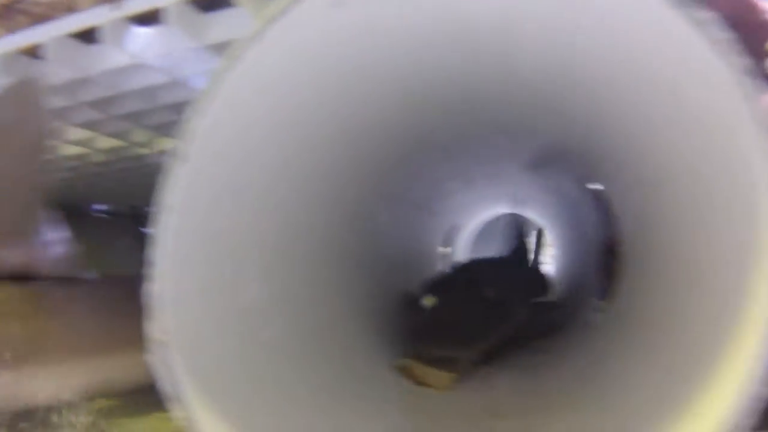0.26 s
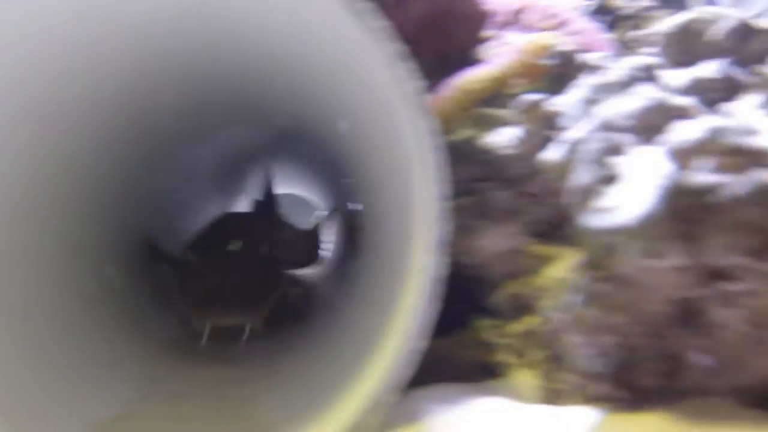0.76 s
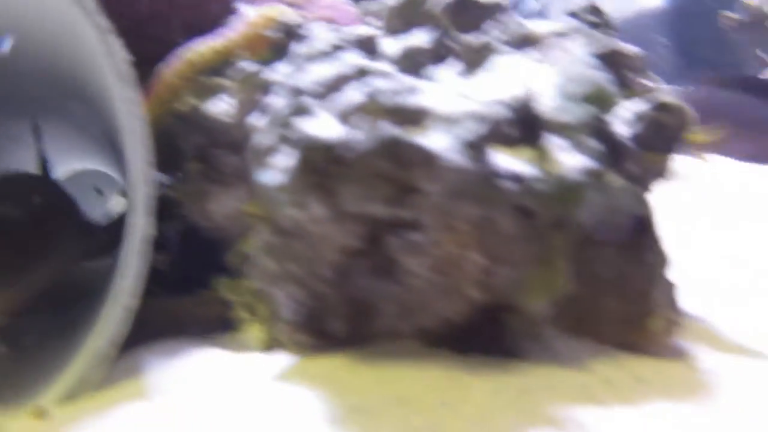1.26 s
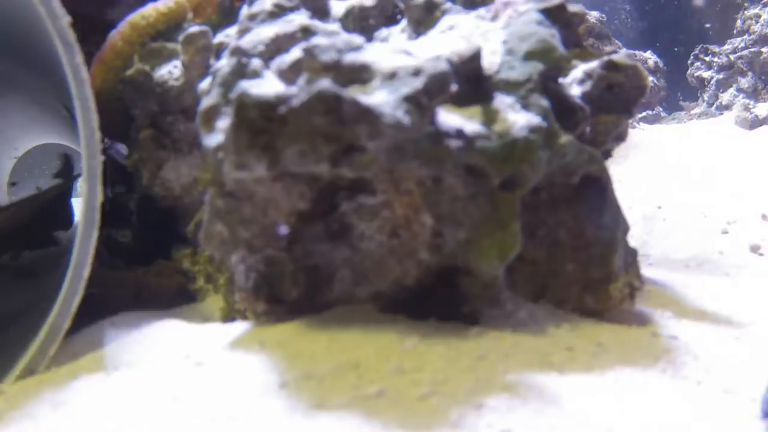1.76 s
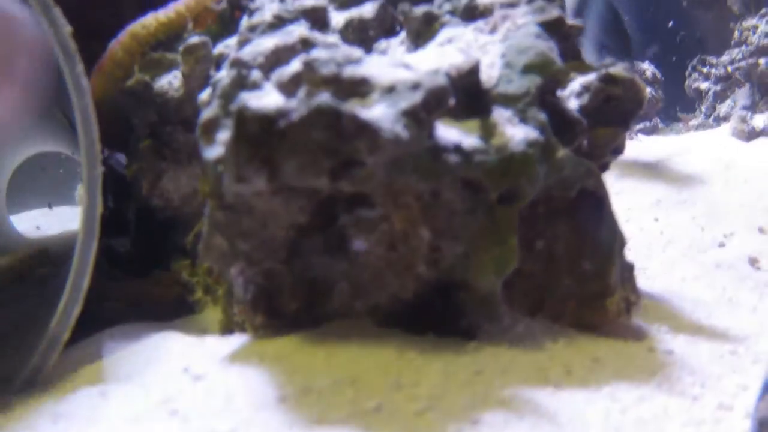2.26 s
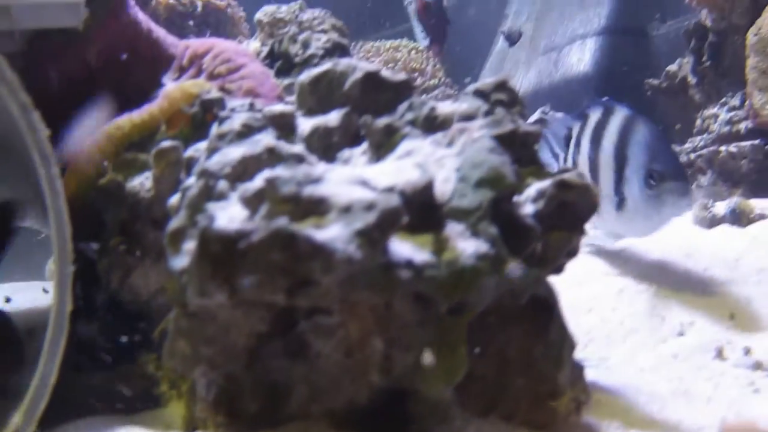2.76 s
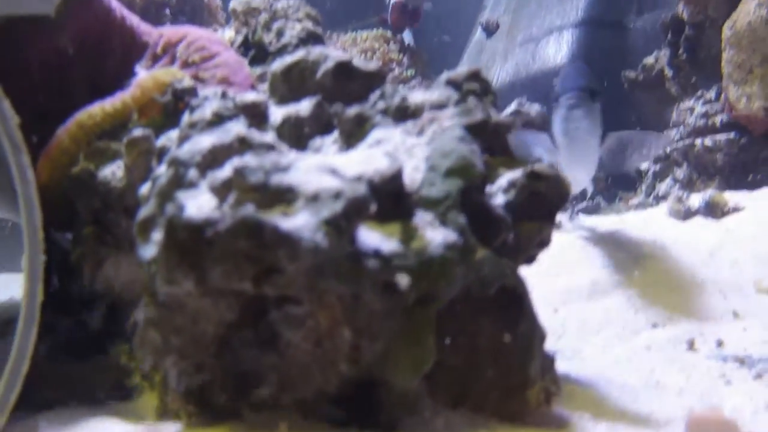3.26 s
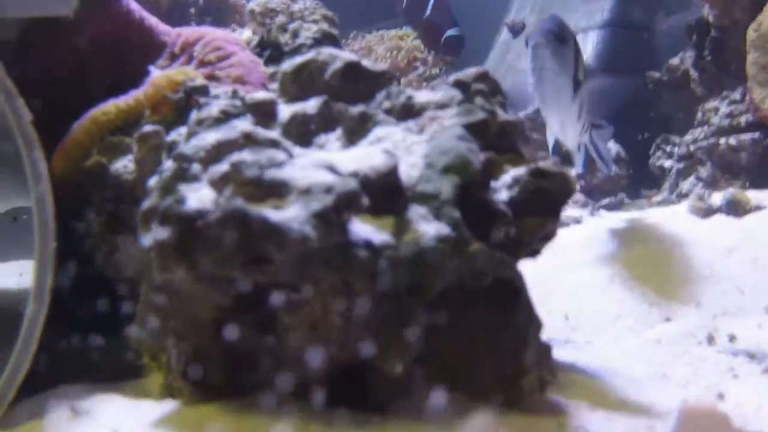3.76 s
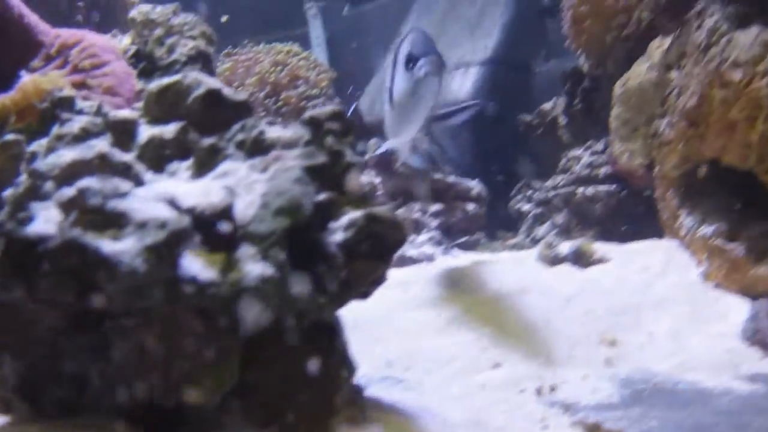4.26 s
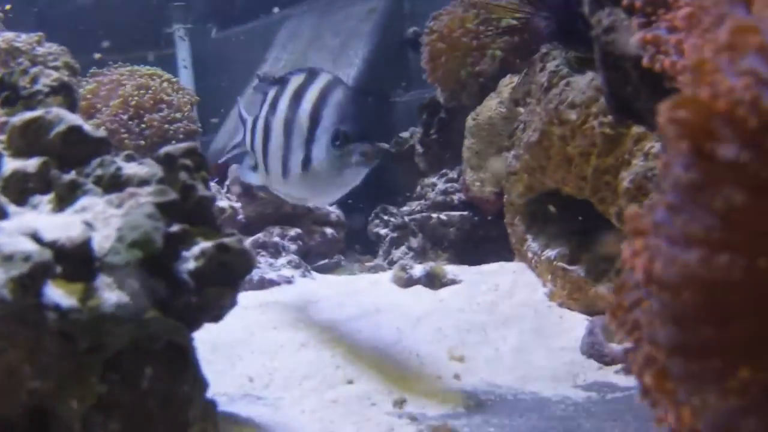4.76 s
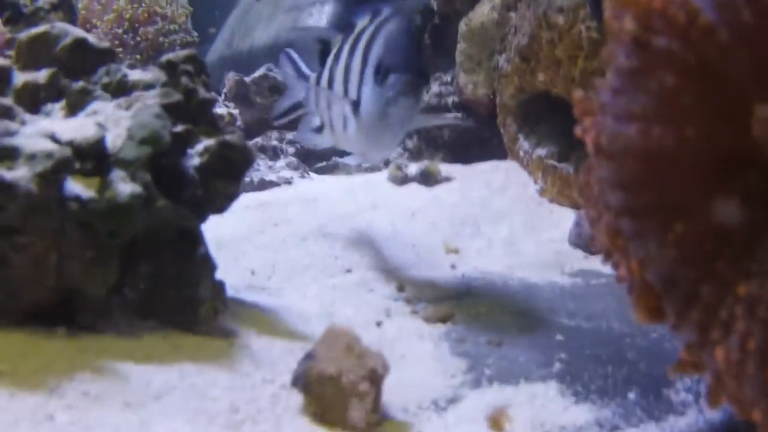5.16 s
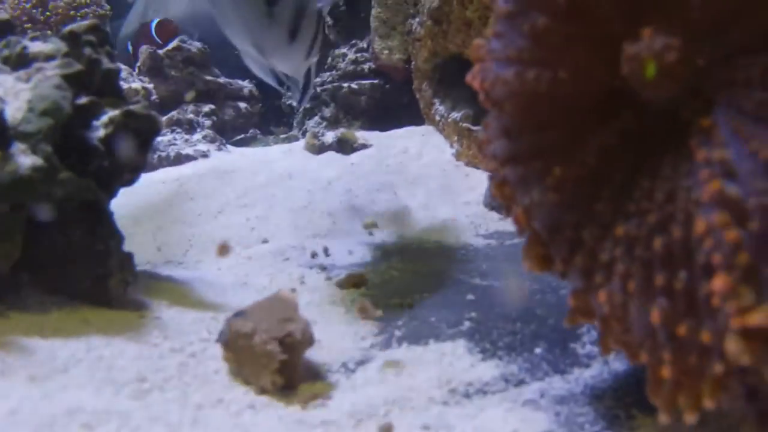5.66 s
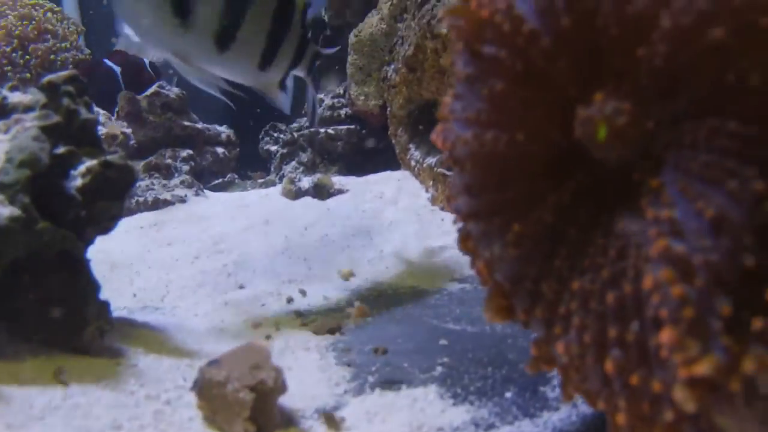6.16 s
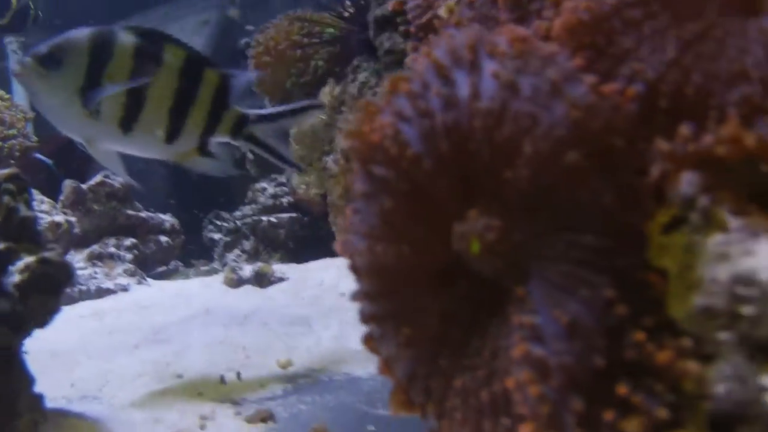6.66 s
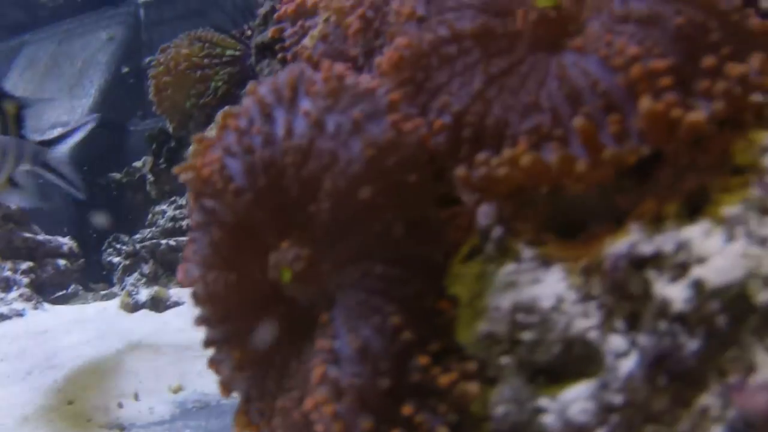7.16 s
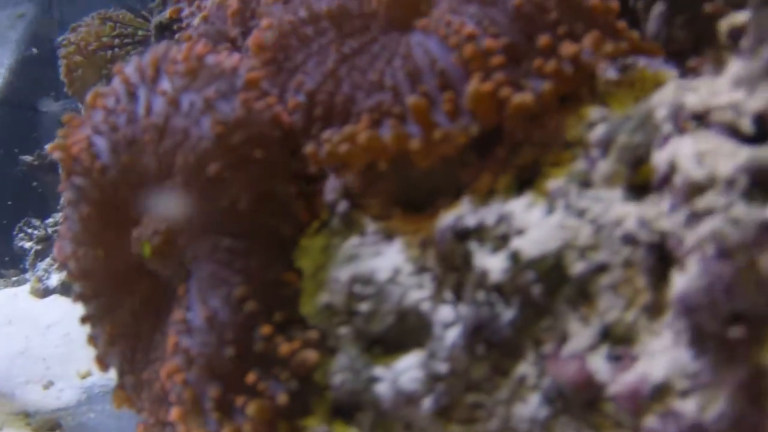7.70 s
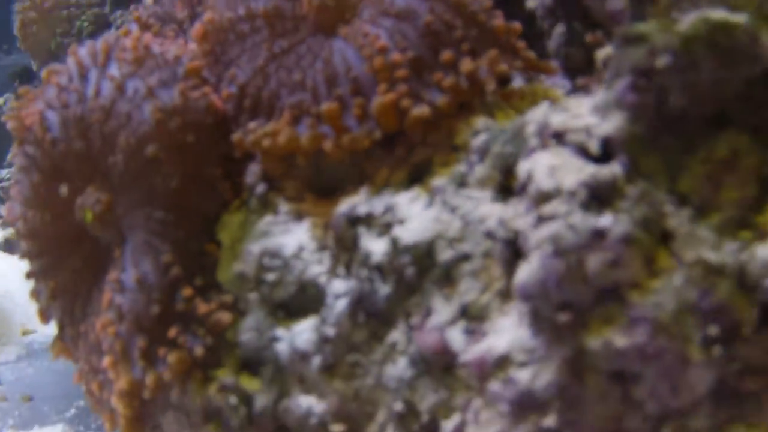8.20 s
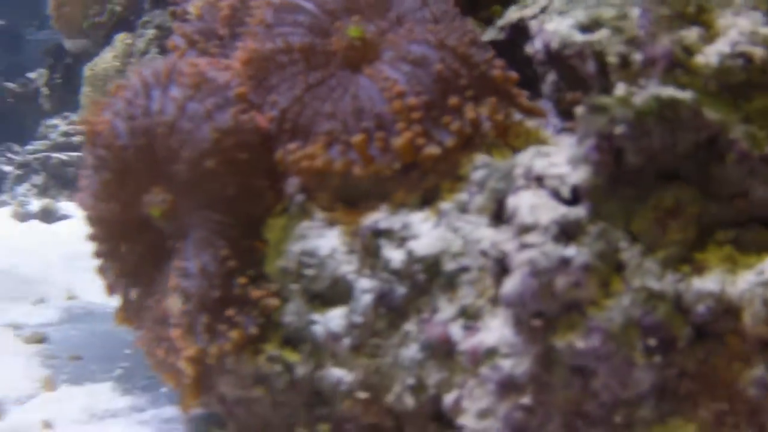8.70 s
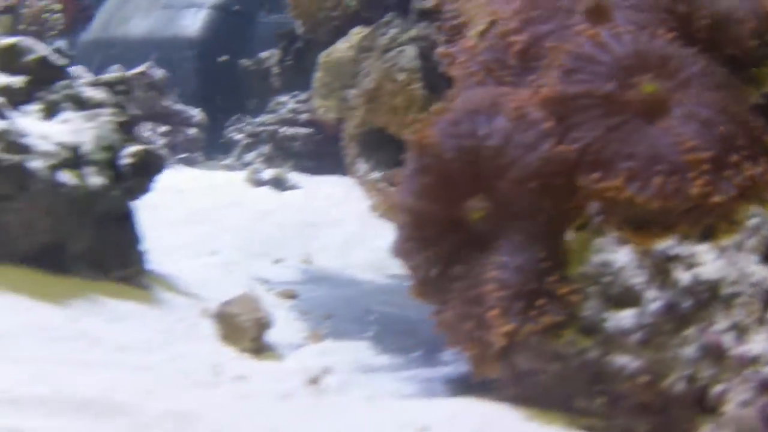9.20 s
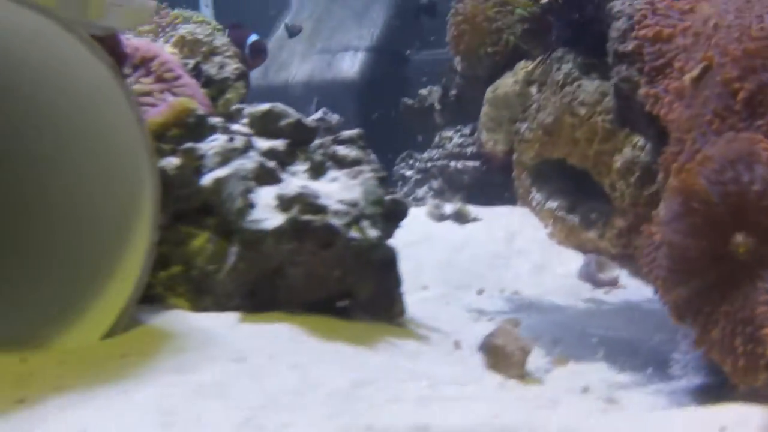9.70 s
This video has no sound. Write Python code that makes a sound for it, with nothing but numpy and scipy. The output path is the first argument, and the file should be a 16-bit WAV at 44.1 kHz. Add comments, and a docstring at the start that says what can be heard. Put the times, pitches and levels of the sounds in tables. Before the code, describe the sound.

A steady low mains hum and lumpy water rumble underlie a microphone enclosed underwater. Sand grains grind along its walls, strongest in the opening second and a half and again just after three and a half seconds. Between strokes come dry, ringing ticks and faint crackling, with a few soft bumps. Later scrapes are lighter, and the ending is mostly sparse clicks. Coarse, narrow, single-channel sound.

```python
"""A camera in a sealed housing slides over the sand of a fish tank: grains scrape its walls in strokes.
Single grains or bubbles tick on the lens cover as short snaps with ringing modes; dull bumps hit the housing.
Behind them pumps hum as sines at multiples of the mains and the water rumbles as shaped noise.
The sound is sampled slowly and each sample is held, which mirrors everything around the sampling rate."""
import sys
import numpy as np
from scipy import signal
from scipy.fft import rfft, irfft
from scipy.io import wavfile

SR = 44100
rng = np.random.default_rng(int(sys.argv[2]) if len(sys.argv) > 2 else 0)


def transcribe(signal):
    """Save signal, clipped to [-1, 1], as a 16-bit WAV file at the path in sys.argv[1]."""
    frames = np.atleast_2d(signal).T
    limited = np.clip(frames, -1, 1)
    pcm = np.round(limited * 32767).astype(np.int16)
    wavfile.write(sys.argv[1], SR, pcm)


N = 438354
TAIL = 4000  # length of one ping in samples


# Strokes over the sand, each a list of (time [s], hiss level above 2900 Hz [dB], low end against the hiss [dB])
STROKES = [
    [(0, -58, -2), (0.25, -56, -4.5), (0.335, -54, -2.5), (0.375, -51, -3), (0.42, -53, 0),
     (0.57, -59.5, -1.5)],
    [(0.57, -57.5, -2), (0.72, -55, -3), (0.78, -56.5, -3), (0.92, -53.5, -3.5), (1.0, -57.5, -2),
     (1.17, -54.5, -6), (1.29, -47, -4), (1.39, -50, -1.5), (1.49, -61, 3), (1.6, -85.5, 0)],
    [(2.07, -90, 6), (2.125, -64, -3), (2.175, -72.5, -9), (2.28, -68.5, 5.5), (2.31, -58.5, 4),
     (2.41, -63, 4.5), (2.51, -59.5, -4), (2.73, -61, 4.5), (2.87, -67, 1)],
    [(2.87, -64.5, 2), (3.0, -65.5, 0.5), (3.2, -69, -1), (3.32, -67.5, 1.5), (3.56, -65, -0.5),
     (3.594, -62, 2)],
    [(3.597, -48, 4), (3.62, -47.5, 3.5), (3.77, -52.5, 1.5), (3.81, -49.5, -2.5), (3.94, -56.5, -4),
     (3.98, -61, -2.5), (4.19, -61, -3), (4.3, -66.5, -0.5)],
    [(4.3, -63, -1.5), (4.36, -67.5, -2), (4.45, -65, 1), (4.51, -59, -2), (4.71, -55, -3.5),
     (4.77, -67, -4)],
    [(4.77, -66, -4), (4.87, -65, -5.5), (5.01, -60.5, -3), (5.09, -53.5, -3), (5.17, -50, -4),
     (5.31, -56.5, -1), (5.47, -60, -4.5), (5.535, -57, -7.5), (5.6, -70.5, 2)],
    [(5.6, -68, 0), (5.63, -64, -3.5), (5.82, -72, -0.5), (5.95, -69, 1), (6.21, -61, -1),
     (6.31, -65.5, -6), (6.37, -64.5, 2.5), (6.45, -68, -0.5), (6.5, -71.5, -5)],
    [(6.5, -69, -6), (6.555, -53.5, 0.5), (6.64, -56.5, -2), (6.86, -57, -4.5), (6.95, -59.5, -3.5),
     (7.17, -59.5, -1.5), (7.26, -55.5, -3), (7.52, -60.5, -1), (7.67, -61.5, -1), (7.72, -69, -8)],
    [(7.72, -66, -1), (7.81, -63.5, -7), (7.99, -58.5, 0), (8.13, -57.5, -3.5), (8.25, -62, -1.5),
     (8.31, -75, 0), (8.41, -63.5, -2), (8.47, -63, -2.5), (8.64, -75, -6)],
    [(8.8, -84, -6), (8.875, -57, -13), (8.9, -61, -4), (8.93, -54, -6), (8.97, -52.5, -4.5),
     (9.05, -72.5, 2), (9.08, -86, 4)],
]
# Spectrum of the sand hiss: (frequency [Hz], relative density [dB per Hz])
SAND_SPECTRUM = [(150, -8), (300, -12), (650, -16), (1200, -12), (1750, -14), (2750, -18), (2920, -14),
                 (3080, -16.5), (4250, -24.5), (4420, -19.5), (4620, -24.5), (5400, -21.5), (5650, -21.5),
                 (6100, -37)]
# Wall modes of the housing: (frequency [Hz], half the width of each resonator [Hz], relative level [dB])
WALL_MODES = [(568, 55, -8), (683, 13, -19.5), (891, 146, -3.5), (1570, 127, 2), (1970, 230, -2),
              (2403, 265, 4.5), (3440, 285, 0.5), (3680, 230, -3)]
# Low end: rumble below 450 Hz, wall modes at 450-720 Hz, wall mode at 720-1200 Hz
LOW_SHARES_DB, LOW_DRIFT_DB = (-4, -1.6, 0.84), 2


def scrape(grains_per_s=1500, grain_db=3.0, share=0.38, catch_db=0.5, drift_db=1.5):
    """Sand grains slip under the housing and ring its walls; each stroke sets its own hiss and low end."""
    t = np.arange(N) / SR
    grain_sizes = gain_of(grain_db * np.minimum(rng.exponential(1, N), 4))
    grains = grain_sizes * (rng.random(N) < grains_per_s / SR)
    grains *= rng.choice([-1., 1.], N)
    slips = share * evened(grains) + (1 - share) * rng.standard_normal(N)
    slips *= gain_of(catch_db * wander(31.7))

    sound = gain_of(10.0) * evened(coloured(slips, SAND_SPECTRUM))
    for hz, half_width, db in WALL_MODES:  # the contact point moves, so each wall mode comes and goes
        once = resonate(slips, hz, 2.0 * half_width)
        twice = resonate(once, hz, 2.0 * half_width)
        sound += gain_of(db + drift_db * wander(9.4)) * evened(twice)

    spectrum = rfft(sound)
    band = np.digitize(np.fft.rfftfreq(N, 1 / SR), [450, 720, 1200, 2900])  # edges in Hz
    low = np.zeros(N)
    for k, db in enumerate(LOW_SHARES_DB):
        low += gain_of(db + LOW_DRIFT_DB * wander(6)) * evened(irfft(spectrum * (band == k), N))
    high = irfft(spectrum * (band > 2), N)
    high /= np.std(irfft(spectrum * (band == 4), N))  # level counts above the tick modes

    out = np.zeros(N)
    for stroke in STROKES:
        s, level_db, low_db = np.transpose(stroke)
        weighted = high + gain_of(np.interp(t, s, low_db)) * low
        out += gain_of(np.interp(t, s, level_db, -200, -200)) * weighted  # silent outside the stroke
    return out


# Clear ticks: (time [s], relative snap level [dB], snap pitch [Hz],
#               relative ring level [dB], pitch favoured by the spot [Hz])
CLEAR_TICKS = [(0.0474, -57, 3520, -48.5, 2160), (1.0294, -51, 3250, -50.5, 2530),
               (1.5494, -70, 3560, -62, 2400), (1.6137, -66, 3630, -69, 2460),
               (1.6334, -65, 3290, -60, 2025), (1.6884, -64, 3360, -62, 2460),
               (1.6943, -57, 3680, -61, 2380), (1.713, -61, 3000, -59, 2370),
               (1.7494, -73, 3250, -64, 2380), (1.782, -72, 3800, -56, 2080),
               (1.8173, -71, 3730, -67, 2340), (1.8394, -71, 3300, -68, 2460),
               (1.861, -72, 3040, -65, 2520), (1.8986, -73, 3220, -66, 2020),
               (1.9194, -71, 3660, -64, 2260), (1.952, -74, 3170, -63.5, 2550),
               (1.9699, -65, 3750, -78, 2320), (2.0354, -64, 3400, -62, 1870),
               (2.0996, -56.5, 3590, -63, 2500), (2.6762, -54, 3180, -53.5, 2300),
               (2.9247, -63, 3500, -58, 2310), (3.0619, -57, 3670, -59, 2280),
               (3.246, -62, 3370, -60.5, 2010), (3.3834, -65, 3380, -58.5, 2295),
               (4.038, -62, 3750, -53, 2380), (4.7985, -55, 3010, -66, 2130),
               (5.8481, -60, 3500, -56, 2460), (5.9444, -60, 3580, -58, 2420),
               (6.0094, -71, 3630, -61, 2320), (6.0554, -69, 3340, -61, 2050),
               (6.1044, -64, 3410, -59, 2240), (6.1414, -58, 3680, -55.5, 2240),
               (6.2734, -67, 2950, -56, 2370), (6.298, -70, 3560, -55.5, 2150),
               (6.37, -49.5, 3500, -55, 2420), (6.4168, -56, 3430, -46.5, 2220),
               (8.2137, -52.5, 4460, -61, 1680), (8.3454, -70, 3620, -64, 2170),
               (8.376, -63, 3420, -54, 2200), (8.4522, -55, 3440, -64, 1640),
               (8.6587, -59.5, 3530, -63, 2700), (8.6894, -68, 3560, -65, 2100),
               (8.7114, -68, 3640, -58.5, 2100), (8.752, -60, 3650, -50.5, 2590),
               (8.778, -67, 3000, -63, 2030), (8.957, -49, 3530, -49.5, 2660),
               (9.0433, -61, 3580, -66, 2330), (9.0594, -69, 3590, -67, 2200),
               (9.0882, -61, 3550, -64, 2170), (9.1381, -64, 3940, -80, 2200),
               (9.1644, -73, 3570, -66.5, 2030), (9.191, -64, 3490, -72, 1650),
               (9.244, -74, 3090, -74, 2080), (9.3312, -54.5, 3580, -84, 2050),
               (9.3636, -60, 3350, -79, 2020), (9.4684, -60, 4820, -80, 1570),
               (9.4963, -60.5, 3450, -85, 2050), (9.5557, -66, 3960, -64, 2750),
               (9.5614, -69, 3120, -62, 2050), (9.606, -72, 3180, -63, 2460),
               (9.6274, -65, 3340, -60, 2230), (9.691, -65, 3580, -62.5, 2460),
               (9.7053, -66, 3280, -78, 2460), (9.8161, -57, 3940, -70, 1690),
               (9.827, -62, 3140, -62, 1600), (9.8645, -61, 3690, -74, 1700),
               (9.9294, -74, 3360, -62, 2250)]


def clear_ticks():
    """Single grains or bubbles hit the lens cover, each spot favouring the modes near one pitch."""
    out = np.zeros(N + TAIL)
    for s, snap_db, snap_hz, ring_db, spot_hz in CLEAR_TICKS:
        out[round(s * SR):][:TAIL] += gain_of(2.0) * tick(snap_db, snap_hz, struck(ring_db, spot_hz))
    return out[:N]


FIZZ_DB, FIZZ_PER_S = -73.5, 50  # level of the smallest ticks before each one's own blend, rate before clustering


def fizz():
    """A patter of faint ticks in clusters; each of twelve spots on the cover rings its own blend."""
    falls = rng.random(N) < FIZZ_PER_S / SR * gain_of(4.0 * wander(5))
    size = gain_of(FIZZ_DB + 1.9 * np.minimum(rng.exponential(1, N), 2.5)) * falls
    spots = rng.random((12, len(COVER_MODES) + 2))
    spot = rng.integers(0, len(spots), N)
    out = np.zeros(N)
    for k, (snap, pitch, *blend) in enumerate(spots):
        faint = tick(-14.0 * snap, 3100 + 900 * pitch, -18.0 * np.array(blend))
        out += signal.oaconvolve(size * (spot == k), faint)[:N]
    return out


# Modes of the lens cover: (frequency [Hz], time to fall 60 dB [s])
COVER_MODES = [(1570, 0.034), (1860, 0.047), (2130, 0.037), (2460, 0.031), (2750, 0.024)]
SPOT_DB_PER_KHZ = 32  # fall of the modes away from the favoured pitch, before tick() widens it


def tick(snap_db, snap_hz, levels_db):
    """A short bright snap with a click at its start, and the modes of the cover ringing on."""
    loudest = max(levels_db)
    levels_db = loudest - 1.8 * (loudest - np.array(levels_db))  # weak modes fall further back
    ring = sum(gain_of(db) * ping(hz, t60, .004) for (hz, t60), db in zip(COVER_MODES, levels_db))
    snap = ping(snap_hz, .022, .0015)
    click = gain_of(1.0) * ping(snap_hz, .006, .0002)
    return gain_of(snap_db - 0.5) * (snap + click) + gain_of(10.5) * ring


def struck(ring_db, spot_hz):
    """Levels of the cover modes: the one nearest the favoured pitch is the loudest."""
    away_khz = abs(np.transpose(COVER_MODES)[0] - spot_hz) / 1000
    return ring_db - SPOT_DB_PER_KHZ * (away_khz - away_khz.min())


# Dull bumps on the housing: (time [s], level before swell and fade [dB], pitch [Hz], time to fall 60 dB [s])
HOUSING_BUMPS = [(2.123, -48, 563, 0.03), (2.747, -42, 581, 0.054), (2.896, -43, 300, 0.03),
                 (3.054, -51, 573, 0.056), (5.363, -55, 380, 0.06), (5.413, -62, 286, 0.041)]


def bumps():
    """Dull knocks on the housing, each one low, quickly fading sine."""
    out = np.zeros(N + TAIL)
    for s, db, hz, t60 in HOUSING_BUMPS:
        out[round(s * SR):][:TAIL] += gain_of(db) * ping(hz, t60, 0.0037)
    return out[:N]


def ping(hz, t60, rise):
    """A sine that swells within the rise time [s] and then dies ever faster."""
    t = np.arange(TAIL) / SR
    fade_db = -60 * (t / max(t60, .005)) ** 1.4
    return np.sin(2 * np.pi * hz * t) * gain_of(fade_db) * (1 - np.exp(-t / rise))


MAINS_HZ = 59.99
# The hum changes with the place in the tank:
# (time [s], level of the second [dB], first [dB] and third [dB] mains multiple)
HUM_LEVELS = [(0, -44, -52, -68), (0.1, -42, -48, -59.5), (1.5, -42.5, -48.5, -60), (2.2, -43.5, -48, -59),
              (3.0, -42, -47.5, -58), (4.1, -42.5, -48, -59.5), (4.7, -41, -48, -60.5),
              (5.3, -40, -47.5, -64), (5.85, -40, -46.5, -63), (6.5, -39, -49, -84),
              (7.0, -38.5, -45, -70.5), (7.8, -38, -45, -66), (8.2, -37.5, -44.5, -60),
              (9.0, -39, -46, -60.5), (9.4, -40.5, -42.5, -72), (9.6, -43.5, -47, -70),
              (9.94, -51.5, -45.5, -72)]
# Higher multiples of the mains: (multiple [count], level around which it wavers [dB])
HUM_OVERTONES = [(5, -76), (6, -79)]
FOURTH_DB = -7.5  # the fourth multiple sits under the third


def pumps():
    """Magnetic hum at mains multiples; all but the second waver."""
    t = np.arange(N) / SR
    s, *levels = np.transpose(HUM_LEVELS)
    second, first, third = (np.interp(t, s, db) for db in levels)
    partials = [
        (1, first + 1.06 * wander(1.3)),
        (2, second),
        (3, third + 1.5 * wander(1.8)),
        (4, third + FOURTH_DB + 2.0 * wander(4.3)),
    ]
    partials += [(round(k), db + 2.1 * wander(2.1)) for k, db in HUM_OVERTONES]
    hum = sum(gain_of(db) * np.cos(2 * np.pi * k * MAINS_HZ * t) for k, db in partials)
    return np.sqrt(2) * hum  # levels are rms


WATER_DB = -52  # rms
# Spectrum of the circulating water: (frequency [Hz], relative density [dB per Hz])
WATER_SPECTRUM = [(8, -25), (27, -23), (36, -6.5), (45, -5), (56, -3), (65, 1), (80, -7), (150, -9.5),
                  (280, -21), (1120, -37.5), (1880, -35.5), (2890, -40), (5000, -42.5), (6100, -48)]


def water():
    """Lumpy rumble of the circulation with a thin hiss above it, both from shaped noise."""
    flow = rng.standard_normal(N) * gain_of(1.6 * wander(14))
    return gain_of(WATER_DB) * evened(coloured(flow, WATER_SPECTRUM))


def gain_of(db):
    """Amplitude factor of a level in dB."""
    return 10 ** (np.asarray(db) / 20)


def evened(x):
    """Scales x to rms 1."""
    return x / np.sqrt(np.mean(x ** 2) + 1e-20)


def coloured(x, points):
    """Filters x by the curve through the (Hz, dB) points."""
    f, db = np.transpose(points)
    hz = np.fft.rfftfreq(len(x), 1 / SR)
    curve_db = np.interp(np.log(hz + 1), np.log(f + 1), db, -60, -90)
    return irfft(rfft(x) * gain_of(curve_db), len(x))


def resonate(x, hz, width):
    """A one-pole complex resonance with a gain near 1 at its peak."""
    r = np.exp(-np.pi * width / SR)
    return 2 * signal.lfilter([1 - r], [1, -r * np.exp(2j * np.pi * hz / SR)], x).real


def wander(hz):
    """Slow chance up to about hz, rms 1."""
    lowpass = signal.butter(2, hz, fs=SR, output="sos")
    return evened(signal.sosfilt(lowpass, rng.standard_normal(N)))


def scene():
    """Scrape, ticks and bumps over the pumps and the water, in one channel."""
    return (scrape() + clear_ticks() + fizz() + bumps() + pumps() + water())[None]


SAMPLING_HZ, HOLD = 12000, 4  # slow sampling rate, repeats of each sample
BLOCK_S, BLOCK_START_S = 1001 / 30000, .005
EDGE_HZ = 15380  # upper band limit


def record(dry):
    """Slow sampling, each sample held four times: mirror images around the rate; then the band limit."""
    held = np.repeat(signal.resample_poly(dry, SAMPLING_HZ, SR, axis=1), HOLD, axis=1)
    held_hz = SAMPLING_HZ * HOLD
    n = np.arange(held.shape[1])
    block = np.floor((n / held_hz - BLOCK_START_S) / BLOCK_S)
    late = (2 * block % 5 < 2).astype(int)  # two blocks in five come one held-rate sample late
    shifted = held[:, np.maximum(n - late, 0)]
    out = signal.resample_poly(shifted, SR, held_hz, axis=1)[:, :N]
    lowpass = signal.firwin(1023, EDGE_HZ, window=("kaiser", 9), fs=SR)
    return signal.oaconvolve(out, lowpass[None], "same")


dry = scene()
out = record(dry)
transcribe(out)
```